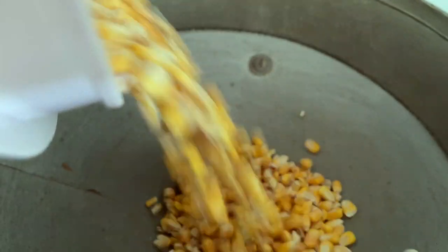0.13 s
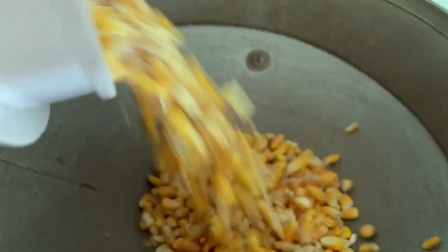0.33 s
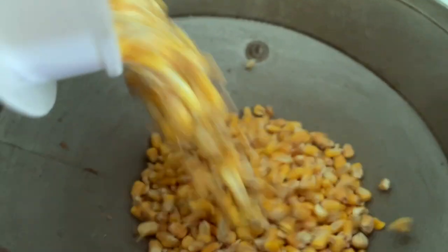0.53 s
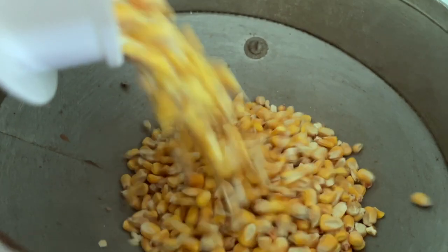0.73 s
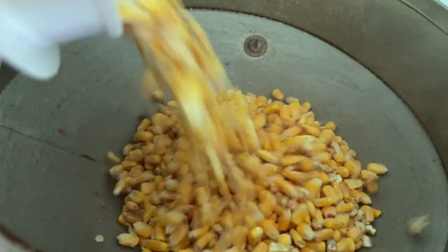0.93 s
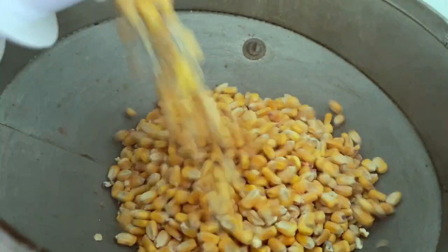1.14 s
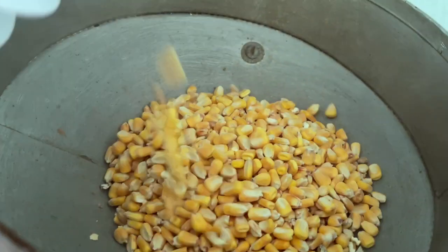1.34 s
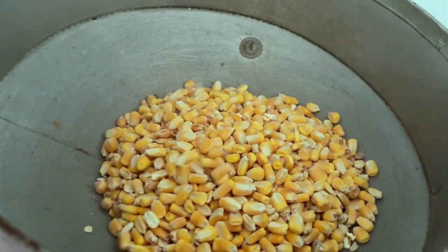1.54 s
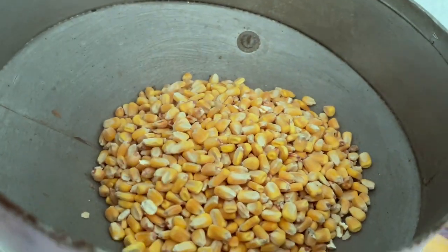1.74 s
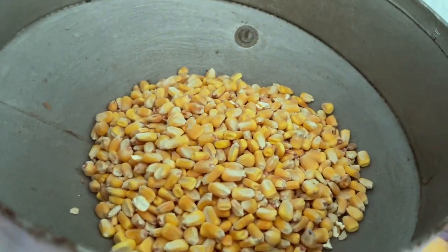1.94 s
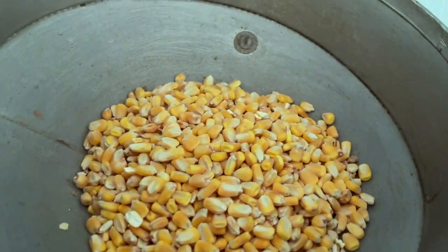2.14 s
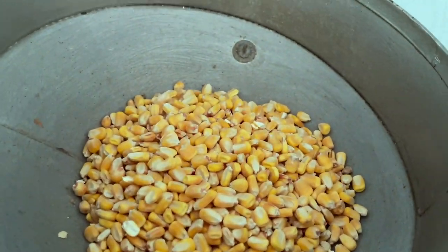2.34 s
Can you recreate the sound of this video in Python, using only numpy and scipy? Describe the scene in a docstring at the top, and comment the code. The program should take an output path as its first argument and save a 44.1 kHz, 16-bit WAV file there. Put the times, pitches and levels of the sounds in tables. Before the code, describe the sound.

A dense rattle of dried corn hitting bare metal stops, then a scoop crunches into more grain

```python
"""Corn into a steel hopper

Dry corn pours from a plastic scoop, close by: kernel clicks patter on the heap, noise bursts and decaying
sines strike and ring the bare wall, and the stream thins to a few stragglers.
Then a duller, hollow crunch, probably the scoop digging into more corn: clicks through shell resonances,
a wobbling groan and soft sine bumps. Filtered noise and a faint hum make the quiet workshop."""
import sys
import numpy as np
from scipy import signal
from scipy.fft import rfft, irfft
from scipy.io import wavfile
from scipy.ndimage import uniform_filter1d

SR = 44100
rng = np.random.default_rng(int(sys.argv[2]) if len(sys.argv) > 2 else 0)


def master(y):
    """Save y as 16-bit WAV."""
    cut = np.clip(np.atleast_2d(y).T, -1, 1)
    pcm = np.round(cut * 32767)  # scale
    wavfile.write(sys.argv[1], SR, pcm.astype(np.int16))


N = 110029

# rel_db: level before the layer's own gain
# workshop background: time_s, level_db
ROOM_LEVEL = [(0, -70), (.6, -61), (1., -54), (2.49, -57)]
# spectra: freq_hz, density_db (per Hz, relative)
ROOM_COLOUR = [(40, -33), (60, -8.5), (85, 0), (130, -6), (400, -12), (2000, -15.5), (8000, -22),
               (14000, -74)]
DIG_COLOUR = [(300, -20), (480, -10.5), (650, -17.5), (800, -5.5), (950, -9), (1100, -2.5), (1400, -3),
              (1700, 1.5), (2150, -3), (2650, -4.5), (4000, -11), (8600, -13), (11300, -13), (12500, -39)]
PATTER_COLOUR = [(300, -45), (700, -9.5), (1050, 3), (1300, -6.5), (2000, 7.5), (2900, 3), (4500, 3),
                 (8700, 9), (10100, 10), (11300, 14.5), (12600, 3.5), (13800, -13), (15500, -0.5)]
STRIKE_COLOUR = [(300, -22.5), (800, -35), (1300, -19), (2000, -3), (2800, -4), (4500, 3.5), (7000, 3.5),
                 (8700, 7.5), (10000, 6), (11500, 7.5), (12700, -7), (14000, -52)]
PING_COLOUR = [(600, -25), (960, -2), (1300, -12), (2000, -3), (2450, 2), (3100, -0.5), (4400, 3),
               (6000, 0), (8700, 5), (11500, -3), (14000, -30)]
DRUM_LOW_COLOUR = [(100, -18.5), (220, -13.5), (275, 0.5), (305, 2.5), (370, -10)]
DRUM_HIGH_COLOUR = [(370, -12), (430, -1.5), (485, -1), (522, 4), (580, -10), (800, -29.5)]
# spectrum of reflections: freq_hz, density_db
ECHO_COLOUR = [(20, 7), (1500, 1.5), (6000, 2.5), (9000, -11.5), (16000, 0)]
# soft scoop knocks: start_s, pitch_hz, peak_db, envelope_s (peak at half of it)
BUMPS = [(2.2, 142, -35.5, 0.0055), (2.245, 62.5, -35, 0.014)]
# scoop judders through corn: peak_s, pitch_hz (before wobble), rel_db, half_length_s
JUDDERS = [(1.77, 304, -45, .025), (1.916, 314.7, -40, 0.021), (1.949, 336.8, -28.5, 0.005),
           (1.973, 328.5, -33, 0.019), (2.008, 357, -34.5, 0.019), (2.027, 348.8, -34.5, 0.012),
           (2.075, 348.3, -37.5, 0.013), (2.127, 337.7, -39, .016)]
# crunch of the digging scoop: time_s, level_db
CRUNCH_LEVEL = [(1.62, -63), (1.64, -52), (1.648, -48), (1.76, -42.5), (1.784, -49.5), (1.806, -41),
                (1.83, -48), (1.936, -41.5), (1.941, -36.5), (1.96, -37), (2.04, -33), (2.13, -32),
                (2.24, -37.5), (2.275, -36), (2.32, -39.5), (2.418, -45), (2.472, -58), (2.482, -47),
                (2.49, -64)]
# hollow rumble of the scoop: time_s, rel_db
HOLLOW_LEVEL = [(1.62, -68), (1.65, -55), (1.77, -49.5), (1.84, -51.5), (1.93, -45.5), (1.95, -35),
                (2.12, -46), (2.18, -53.5), (2.4, -60)]
# kernels cracking against the scoop: start_s, rel_db
SNAPS = [(1.739, -26), (1.9405, -21), (1.9592, -18.5), (2.1518, -17.5)]
# upper resonances of the scoop shell: freq_hz, rel_db, t60_s
SHELL_MODES = [(785, -8.5, 0.16), (1140, -3, 0.011), (1618, -2, 0.087), (2090, 4.5, 0.037),
               (2230, -1.5, 0.055)]
# resonance of the filling scoop: time_s, pitch_hz, level_db
FILLING = [(1.94, 815, -55.5), (2.001, 788, -36.5), (2.055, 791, -37), (2.095, 835, -40), (2.16, 870, -61),
           (2.25, 900, -47.5)]
# lone kernels on the bare wall: start_s, rel_db
PINGS = [(1.5616, -19), (1.5921, -30.5), (1.601, -31.5)]
# stream on the heap: time_s, rel_db
FLOW = [(0.0, -32.5), (0.224, -35.5), (0.522, -34.5), (.665, -33), (.70, -35.5), (0.766, -31),
        (0.974, -31.5), (1.11, -35), (1.21, -32.5), (1.358, -43), (1.502, -55.5), (1.62, -61)]
# last single kernels on the heap: start_s, rel_db
STRAGGLERS = [(1.3015, -21), (1.3352, -19), (1.3488, -30), (1.3648, -21), (1.3868, -15), (1.3925, -21),
              (1.4205, -19), (1.4238, -20.5), (1.4555, -36), (1.4715, -25), (1.4835, -23.5),
              (1.5335, -25.5), (1.5418, -38)]
# broad resonances of the sheet under the heap: freq_hz (before drift), rel_db, t60_s
SHEET_MODES = [(1469, 2, 0.039), (1877, 2.5, 0.048), (2365, 5.5, 0.035)]
# drumming of the loaded hopper, lower and upper resonance: time_s, rel_db
DRUM_LOW_LEVEL = [(0, -61), (.7, -58), (.85, -48), (1.11, -56.5), (1.19, -55), (1.32, -54.5), (1.36, -58),
                  (1.62, -64)]
DRUM_HIGH_LEVEL = [(0, -61), (.88, -52.5), (1.01, -49), (1.1, -53), (1.16, -47), (1.34, -59), (1.62, -65)]
# kernel clumps on the wall: start_s, rel_db, body_db (re strength), crack_db (re strength),
# decay_s (1 ms at least)
STRIKES = [(0.0004, -4.5, -10.5, -3, 0.0016), (0.0084, -13.5, -11.5, -10.5, 0.033),
           (0.0198, -11.5, -14, -20, 0.012), (0.0497, -15, -8, -10, 0.017), (0.0612, -9.5, -9, -8, 0.0075),
           (0.1001, -3.5, -11, -5, 0.0018), (0.1067, -10.5, 0.5, -17, 0.00083),
           (0.155, -9, -10, -7.5, 0.01), (0.1699, -9, -3, -18, 0.0025), (0.2267, -18, -10.5, -9, 0.015),
           (0.2469, -7.5, -5.5, -10.5, 0.0013), (0.3185, -16.5, -12, -15, 0.023),
           (0.3464, -17, -7.5, -5, 0.0031), (0.3876, -13, -24, -7, 0.0072),
           (0.4157, -13, -5.5, -2.5, 0.0019), (0.4726, -14.5, -12, -12.5, 0.0077),
           (0.528, -21.5, -5.5, -18, 0.005), (0.4859, -14, -11, -7.5, 0.005),
           (0.5522, -17.5, -10.5, -16.5, 0.0061), (0.5606, -7.5, -26, -14, 0.005),
           (0.5976, -18, -6.5, -10, 0.0023), (0.7181, -16.5, -18, -7, 0.0045),
           (0.7324, -11, -13.5, -11.5, 0.0037), (0.7827, -23, -26, -16, 0.0028),
           (0.801, -18, -17, -11, 0.002), (0.9004, -20, -14.5, -10.5, 0.011),
           (0.9208, -16, -12, -7, 0.0094), (0.9288, -12.5, -15.5, -12, 0.0081),
           (0.963, -15.5, -9, -15, 0.0051), (1.0413, -23, -25, -5, 0.0035), (1.0685, -14, -8, -9.5, 0.0063),
           (1.0853, -13, -14, -10, 0.0039), (1.0965, -14, -6, -14, 0.0064),
           (1.1044, -17, -16, -7.5, 0.0062), (1.151, -12, -11, -11.5, 0.0045),
           (1.1818, -17, -6.5, -15, 0.0045), (1.3127, -23, -13, -4.5, 0.0049),
           (1.321, -14.5, -8, -20, 0.0039)]
# ringing of the steel wall: freq_hz (before detuning), rel_db, t60_s
WALL_MODES = [(1470, -8, .15), (1965, -4, .1), (2359, -1.5, .09), (2690, -9, .12), (3246, -6, .2),
              (3772, -7.5, .2), (4340, -6, .15), (4690, -6, .12), (6010, -3, .16), (6670, -6, .18),
              (7558, -3, .15), (7990, -2, .13), (8260, -4, .14), (8645, -4, .14), (9120, -6, .16)]
# two microphone ports: freq_hz, left_lead_rad
PORT_PHASE = [(100, 0), (350, 0.27), (1100, 0.77), (1550, -2), (2600, 0.71), (5300, 1.07), (6700, 0.7),
              (7600, 0.74), (8800, 0.86), (10200, -5), (11900, -4.5), (16000, -14)]
# two microphone ports: freq_hz, left_minus_right_db
PORT_BALANCE = [(200, 0.4), (1150, 2.5), (1900, -1), (3000, 2), (4900, 2.5), (6200, 1), (7300, 2.5),
                (8500, 0.6), (13000, 0)]

TOP_HZ = 15900  # highest click pitch and output cutoff
HUM_HZ, HUM_DB = 64, -8  # peak amplitude re the background
GROAN_DB, GROAN_WOBBLE = -1, 0.045  # wobble: rms share of the pitch
CRUNCH_PER_S, CRUNCH_SCATTER_DB, CRUNCH_S = 2200, 1, 0.001
SCOOP_LOW_HZ, SCOOP_HIGH_HZ, HOLLOW_DB = 272, 404, -0.5  # band radiated by the scoop walls
SNAP_DB, SNAP_S = -12, 0.0031
SHELL_DB, FILLING_T60_S = -5, 0.057  # shell level re the crunch
PING_DB, PING_S, PING_TAIL_DB, PING_TAIL_S = -1, 0.00055, -8.5, 0.0063
PING_MODE_HZ, PING_MODE_DB, PING_MODE_S, PING_RING_DB = 2410, -14.5, 0.0056, -34
PATTER_DB, KERNELS_PER_S, KERNEL_SCATTER_DB, KERNEL_S = 0.4, 1700, 1.25, 0.0013  # rate at median flow
BOUNCE_DB, BOUNCES_PER_S, BOUNCE_SCATTER_DB, BOUNCE_S = -7, 150, 0.6, 0.0011  # rate at median flow
SHEET_DB, SHEET_DRIFT = -12, 0.014  # drift: rms share of the pitch
STRAGGLER_DB, STRAGGLER_S, DRUM_DB = -9, 0.0018, 0.5
STRIKE_DB, ATTACK_S, TAIL_DB, TAIL_S = 1.5, 0.0025, -22, 0.08
STRIKE_SPLIT_HZ, COPY_GAIN_MAX = 5500, 0.43  # body/crack split; largest gain of the delayed copy
RING_DB, MODE_SCATTER_DB, DETUNE_HZ = -20, 2, 6.7  # scatter and detuning: rms per blow


def undb(db):
    """Decibels to gain."""
    return 10 ** (np.asarray(db) / 20)


def unit(x):
    """Scale to rms 1."""
    return x / np.sqrt(np.mean(x ** 2) + 1e-18)


def curve(rows):
    """Gain along (time_s, level_db) points, dying away at 600 dB/s outside them."""
    t, (s, db) = np.arange(N) / SR, np.array(rows).T
    outside_s = np.maximum(s[0] - t, 0) + np.maximum(t - s[-1], 0)
    return undb(np.interp(t, s, db) - 600 * outside_s)


def along(points, hz):
    """Read (freq_hz, value) points on a log-frequency axis."""
    f, value = np.array(points).T
    return np.interp(np.log(hz + 1), np.log(f), value)


def colour(x, points):
    """Minimum-phase filter, unit power gain; drops 24 dB/octave for two octaves past its end points."""
    size = 4096
    hz = np.arange(size // 2 + 1) * SR / size + 1
    below_oct = np.maximum(np.log2(points[0][0] / hz), 0)
    above_oct = np.maximum(np.log2(hz / points[-1][0]), 0)
    gain_db = along(points, hz) - 24 * np.minimum(below_oct + above_oct, 2)
    cepstrum = irfft(np.log(undb(gain_db)))
    # fold to make the response causal
    cepstrum[1:size // 2] *= 2
    cepstrum[size // 2 + 1:] = 0
    response = irfft(np.exp(rfft(cepstrum)))
    return signal.fftconvolve(x, response / np.linalg.norm(response))[:N]


def add(track, s, sound):
    """Mix a sound in at time s."""
    i = int(np.clip(s * SR, 0, N - 1))
    track[i:i + len(sound)] += sound[:N - i]


def fade(t, t60):
    """Exponential decay by 60 dB in t60 seconds."""
    return np.exp(-np.log(1000) * t / t60)


def ring(x, modes):
    """Pass x through decaying (freq_hz, rel_db, t60_s) modes."""
    t = np.arange(SR // 3) / SR
    response = np.zeros(len(t))
    for hz, db, t60 in modes:
        response += undb(db) / np.sqrt(t60) * np.sin(2 * np.pi * hz * t) * fade(t, t60)
    return unit(signal.fftconvolve(x, response)[:N])


def wander(rate_hz):
    """Smooth random drift, about rate_hz turns per second, rms 1."""
    k = int(SR / rate_hz)
    steps = np.repeat(rng.standard_normal(N // k + 1), k)
    return unit(uniform_filter1d(steps, k)[:N])


def glide(x, hz, t60):
    """Pass x through one resonance of moving pitch: shift to 0 Hz, one-pole decay, shift back."""
    turn = np.exp(2j * np.pi * np.cumsum(hz) / SR)
    pole = fade(1 / SR, t60)
    return unit((turn * signal.lfilter([1], [1, -pole], x / turn)).imag)


def clicks(rate_per_s, scatter_db, decay_s, count=10000):
    """Random kernel contacts: tone-and-noise bursts of random pitch and size; steady mean power."""
    t = np.arange(SR // 200) / SR
    when, keep, size, pitch, phase = rng.random((count, 5)).T
    grit = rng.standard_normal((count, len(t)))
    rate, out = rate_per_s * np.ones(N), np.zeros(N)
    size = undb(scatter_db * np.minimum(-np.log(size), 4))
    # thin the candidates to the wanted rate
    kept = keep < rate[(when * N).astype(int)] * N / SR / count
    for k in np.flatnonzero(kept):
        tone = np.sqrt(2) * np.sin(2 * np.pi * (pitch[k] * TOP_HZ * t + phase[k]))
        add(out, when[k] * N / SR, size[k] * (tone + grit[k]) * np.exp(-t / decay_s))
    return unit(out / np.sqrt(rate))


def ticks(rows, decay_s):
    """Single dry kernel contacts: short noise bursts with a soft onset."""
    t, out = np.arange(SR // 30) / SR, np.zeros(N)
    envelope = np.sqrt(2 * t / decay_s) * np.exp(-t / decay_s)
    for s, db in rows:
        add(out, s, undb(db) * rng.standard_normal(len(t)) * envelope)
    return out


def space(x, wet_db, t60):
    """Direct sound plus dense, duller reflections that differ left and right."""
    t = np.arange(SR // 3) / SR
    echoes = rng.standard_normal((2, len(t))) * fade(t, t60)
    echoes /= np.linalg.norm(echoes, axis=1, keepdims=True)
    wet = signal.fftconvolve(colour(x, ECHO_COLOUR)[None], echoes, axes=1)[:, :N]
    return (x + undb(wet_db) * wet) / np.hypot(1, undb(wet_db))


def spread(make, apart_db):
    """Widen a source: one draw shared by both channels plus a separate echo-coloured draw in each."""
    shared = make()
    own = np.array([colour(make(), ECHO_COLOUR) for _ in range(2)])
    return (shared + undb(apart_db) * own) / np.hypot(1, undb(apart_db))


def workshop():
    """Low room rumble from coloured noise, with a faint sine machine hum."""
    rumble = spread(lambda: unit(colour(rng.standard_normal(N), ROOM_COLOUR)), apart_db=-17)
    hum = undb(HUM_DB) * np.sin(2 * np.pi * HUM_HZ * np.arange(N) / SR)
    return curve(ROOM_LEVEL) * (rumble + hum)


def bumps():
    """Dull scoop knocks: heavily damped low sines."""
    t, out = np.arange(SR // 4) / SR, np.zeros(N)
    for s, hz, db, envelope_s in BUMPS:
        envelope = 2 * t / envelope_s * np.exp(1 - 2 * t / envelope_s)
        add(out, s, undb(db) * np.sin(2 * np.pi * hz * t) * envelope)
    return out


def groan():
    """The scoop sticks and slips; every push swells its lowest mode, a sine of wobbling pitch."""
    t = np.arange(N) / SR
    push = sum(undb(db) * np.exp(-((t - s) / half_s) ** 2) for s, _, db, half_s in JUDDERS)
    s, hz = np.array(JUDDERS).T[:2]
    pitch_hz = np.interp(t, s, hz) * (1 + GROAN_WOBBLE * wander(120))
    return undb(GROAN_DB) * push * unit(np.sin(2 * np.pi * np.cumsum(pitch_hz) / SR))


def scoop():
    """Kernels grind and snap on the scoop, stir its hollow body and a note that dips, then rises as it fills."""
    def grind():
        return clicks(CRUNCH_PER_S, CRUNCH_SCATTER_DB, CRUNCH_S)

    dig = curve(CRUNCH_LEVEL)
    crunch = dig * spread(lambda: unit(colour(grind(), DIG_COLOUR)), apart_db=-2.0)
    shell = undb(SHELL_DB) * dig * spread(lambda: ring(grind(), SHELL_MODES), apart_db=0)
    band = signal.butter(3, [SCOOP_LOW_HZ, SCOOP_HIGH_HZ], "band", fs=SR, output="sos")
    rumble = spread(lambda: unit(signal.sosfilt(band, grind())), apart_db=0)
    hollow = undb(HOLLOW_DB) * curve(HOLLOW_LEVEL) * rumble
    snaps = undb(SNAP_DB) * colour(ticks(SNAPS, SNAP_S), STRIKE_COLOUR)
    s, hz, db = np.array(FILLING).T
    pitch_hz = np.interp(np.arange(N) / SR, s, hz)
    filling = curve(np.c_[s, db]) * glide(grind(), pitch_hz, FILLING_T60_S)
    return crunch + shell + space(snaps, wet_db=-18, t60=0.058) + hollow + filling


def steel(t):
    """One wall ring: decaying modes, stirred differently at every spot and detuned a little by the load."""
    hz, db, t60 = np.array(WALL_MODES).T[:, :, None]
    size = undb(db + MODE_SCATTER_DB * rng.standard_normal(hz.shape))
    hz = hz + DETUNE_HZ * rng.standard_normal(hz.shape)
    tones = np.sin(2 * np.pi * (hz * t + rng.random(hz.shape)))
    return np.sum(size * tones * fade(t, t60), axis=0)


def pings():
    """A lone kernel on bare steel: sharp noise crack, short note of one mode, faint ring."""
    t, cracks, rings = np.arange(SR // 5) / SR, np.zeros(N), np.zeros(N)
    envelope = np.exp(-t / PING_S) + undb(PING_TAIL_DB) * np.exp(-t / PING_TAIL_S)
    note = undb(PING_MODE_DB) * np.sin(2 * np.pi * PING_MODE_HZ * t) * np.exp(-t / PING_MODE_S)
    for s, db in PINGS:
        add(cracks, s, undb(db + PING_DB) * envelope * rng.standard_normal(len(t)))
        add(rings, s, undb(db) * (note + undb(PING_RING_DB) * steel(t)))
    return space(colour(cracks, PING_COLOUR) + rings, wet_db=-5, t60=0.041)


def heap():
    """Kernels patter on the heap, fewer as the stream thins; some bounce onto steel; the hopper drums."""
    flow = curve(FLOW)
    share = np.clip(flow / np.median(flow), .12, 1.3)

    def contacts():
        return clicks(KERNELS_PER_S * share, KERNEL_SCATTER_DB, KERNEL_S)

    patter = spread(lambda: unit(colour(contacts(), PATTER_COLOUR)), apart_db=-6.0)
    load = contacts()
    hits = clicks(BOUNCES_PER_S * share, BOUNCE_SCATTER_DB, BOUNCE_S)
    bounces = undb(BOUNCE_DB) * flow * colour(hits, STRIKE_COLOUR)
    # the shifting load moves the sheet modes
    modes = np.zeros(N)
    for hz, db, t60 in SHEET_MODES:
        modes += undb(db) * glide(load + hits, hz * (1 + SHEET_DRIFT * wander(18)), t60)
    sheet = undb(SHEET_DB) * flow * unit(modes)
    last = undb(STRAGGLER_DB) * colour(ticks(STRAGGLERS, STRAGGLER_S), PATTER_COLOUR)
    drum_low = curve(DRUM_LOW_LEVEL) * unit(colour(load, DRUM_LOW_COLOUR))
    drum_high = curve(DRUM_HIGH_LEVEL) * unit(colour(contacts(), DRUM_HIGH_COLOUR))
    reflected = space(last + sheet + bounces, wet_db=-11, t60=0.02)
    return undb(PATTER_DB) * flow * patter + reflected + undb(DRUM_DB) * (drum_low + drum_high)


def wall():
    """Each clump makes a noise crash of crowded sheet modes with a short tail; a few clear modes ring on."""
    t, crashes, rings = np.arange(SR // 5) / SR, np.zeros(N), np.zeros(N)
    lower = signal.butter(2, STRIKE_SPLIT_HZ, "low", fs=SR, output="sos")
    upper = signal.butter(2, STRIKE_SPLIT_HZ, "high", fs=SR, output="sos")
    attack = np.minimum(t / ATTACK_S, 1)
    tail = undb(TAIL_DB) * np.exp(-t / TAIL_S)
    for s, db, body_db, crack_db, decay_s in STRIKES:
        body_noise, crack_noise = rng.standard_normal((2, len(t)))
        body = undb(body_db) * unit(signal.sosfilt(lower, body_noise))
        crack = undb(crack_db) * unit(signal.sosfilt(upper, crack_noise))
        crash = body + crack
        # a short delayed copy gives each crash its own colour
        lag_samples = rng.integers(3, 16)
        delayed_copy = COPY_GAIN_MAX * rng.uniform(0.15, 1) * np.roll(crash, lag_samples)
        crash = undb(db + STRIKE_DB) * (crash + delayed_copy)
        add(crashes, s, crash * attack * (np.exp(-t / max(decay_s, 1e-3)) + tail))
        add(rings, s, undb(RING_DB) * np.std(crash) * attack * steel(t))
    crashes = space(colour(crashes, STRIKE_COLOUR), wet_db=-9, t60=0.045)
    return crashes + space(rings, wet_db=-15, t60=0.011)


def scene():
    """All sources reach two close ports, which shift level and phase between left and right."""
    mix = workshop() + bumps() + groan() + scoop() + pings() + heap() + wall()
    hz = np.arange(N // 2 + 1) * SR / N
    half = np.array([[.5], [-.5]])
    ports = undb(half * along(PORT_BALANCE, hz)) * np.exp(1j * half * along(PORT_PHASE, hz))
    return irfft(rfft(mix) * ports, N)


def record(dry):
    """The recorder cuts the top: steep elliptic low-pass."""
    lowpass = signal.ellip(8, .2, 80, TOP_HZ, fs=SR, output="sos")
    return signal.sosfilt(lowpass, dry)


dry = scene()
out = record(dry)
master(out)
```